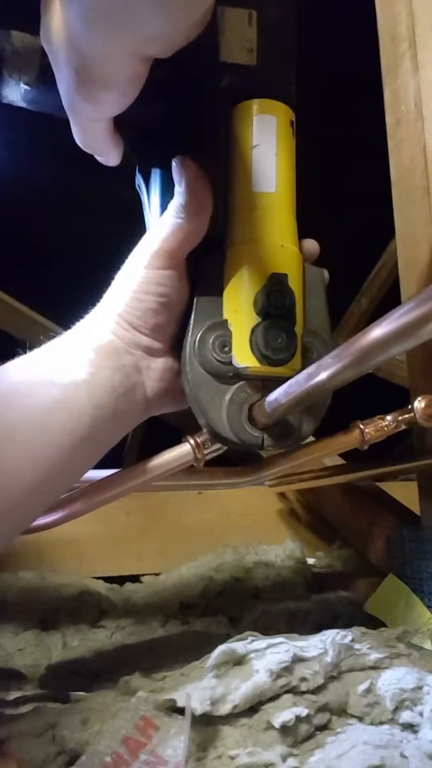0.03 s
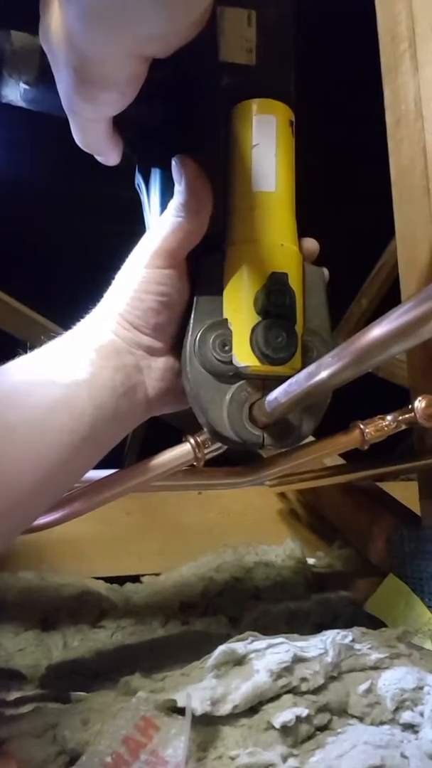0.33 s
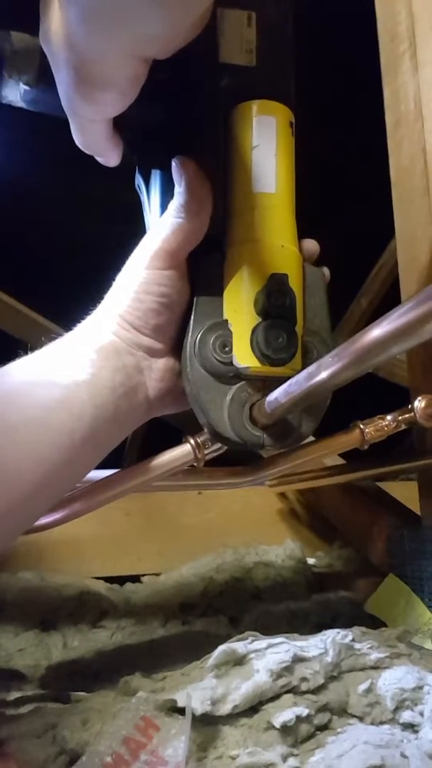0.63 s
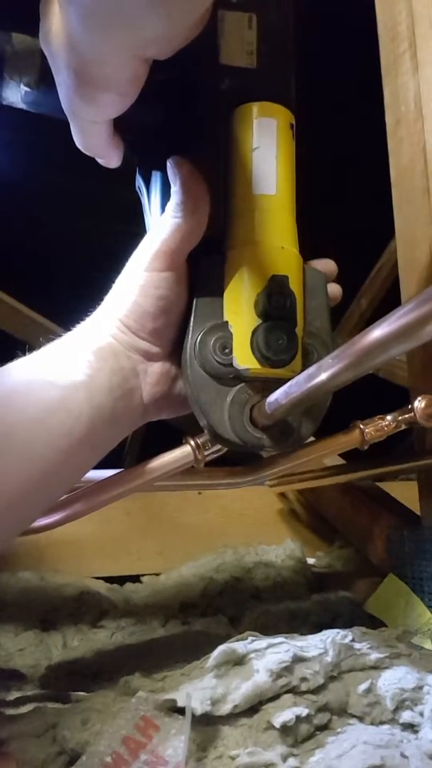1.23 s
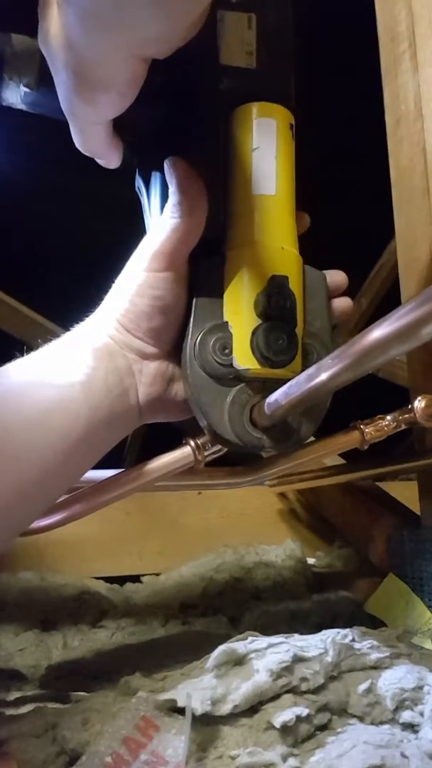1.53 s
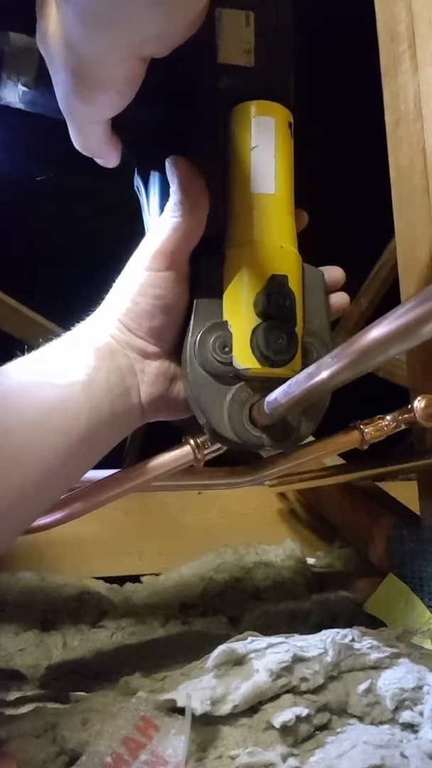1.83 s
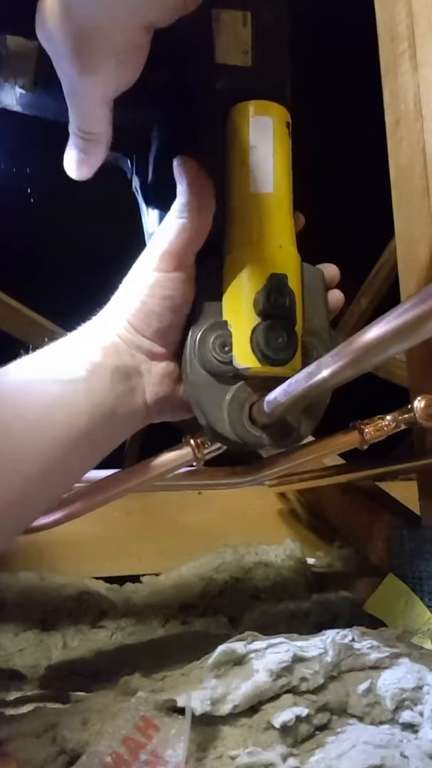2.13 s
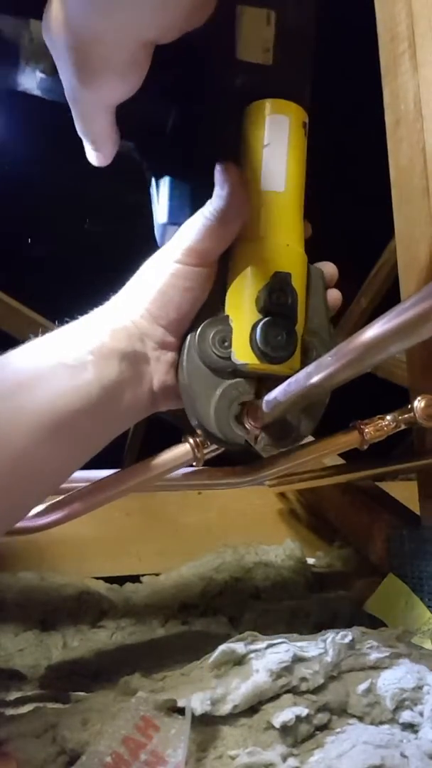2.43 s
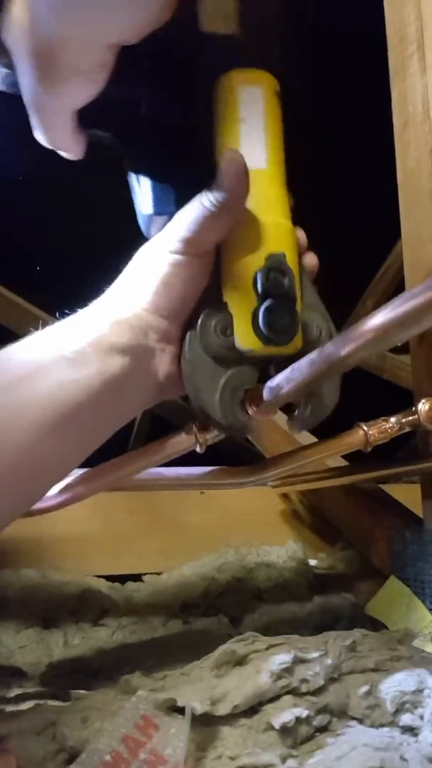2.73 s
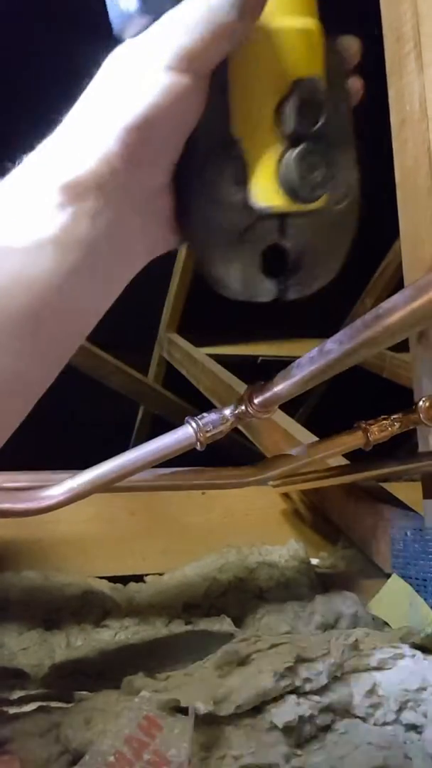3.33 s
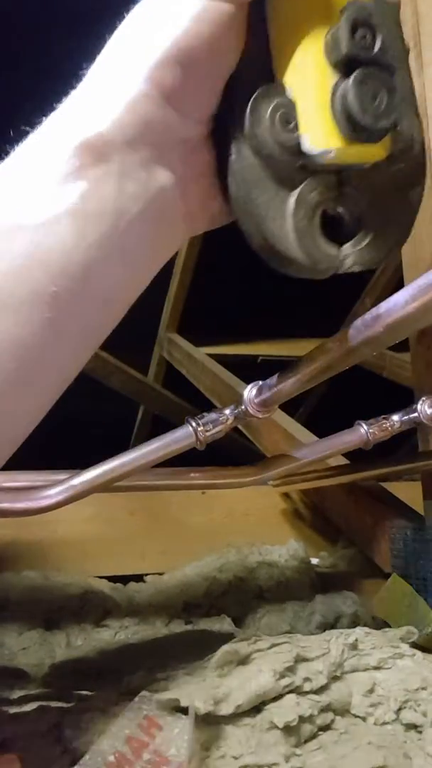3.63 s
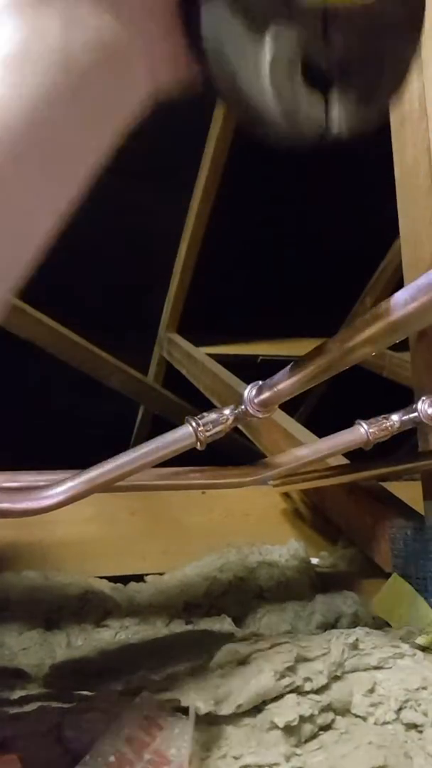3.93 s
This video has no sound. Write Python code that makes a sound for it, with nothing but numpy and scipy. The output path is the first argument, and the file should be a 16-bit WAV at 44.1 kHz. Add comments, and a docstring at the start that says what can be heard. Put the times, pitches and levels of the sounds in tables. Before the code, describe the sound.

Close up in an attic, a hydraulic crimping tool runs with a fast rattling whine, strains, pops and cuts out. Metal jaws then clunk open and knock against copper pipe, followed by light clicks and faint handling.

```python
"""A cordless hydraulic press tool crimps a copper fitting, close by in an attic.
Its geared motor drives a rattling piston pump and sags under load until the relief valve pops,
then runs free under the valve's whistle and stops. The steel jaws clunk open, knock against the pipe
and click shut; the tool is lifted away with a rustle and a soft bump."""
import sys
import numpy as np
from scipy import signal
from scipy.fft import rfft, irfft
from scipy.io import wavfile

SR = 44100
rng = np.random.default_rng(int(sys.argv[2]) if len(sys.argv) > 2 else 0)


def wav_out(sig):
    """Save sig, one row per channel (or a flat mono array), as 16-bit PCM at SR to the path in sys.argv[1]."""
    wavfile.write(sys.argv[1], SR, np.round(np.clip(np.atleast_2d(sig).T, -1, 1) * 32767).astype(np.int16))


N = 176400
TIME = np.arange(N) / SR
GEAR_RATIO, RELEASE_S = 15, 1.75  # shaft turns per pump turn; when the valve has shed the load
WAVER_RAD, METAL_CRACK = .12, .8  # phase drift of the drive tones; first contact of bare metal

# Motor shaft speed: time_s, speed_hz
SHAFT_SPEED = [(0.0, 417.0), (0.3, 413.6), (0.7, 411.7), (1.0, 406.4), (1.25, 400.2), (1.45, 392.0),
               (1.6, 377.4), (1.69, 362.2), (1.73, 374.0), (1.76, 400.0), (1.79, 416.0), (1.87, 424.7),
               (1.932, 425.0), (1.955, 275.0), (1.98, 110.0), (2.02, 20.0)]
# Stereo placement of the tool body: freq_hz, left_minus_right_db
TOOL_PAN = [(60, -19), (110, -3.5), (200, -2.5), (380, -4), (700, 9), (1290, 10.5), (2380, 15), (4400, 4.5),
            (8120, 15.5), (15000, 17.5)]
# Stereo placement of the jaws: freq_hz, left_minus_right_db
JAW_PAN = [(60, -7.5), (250, -1), (700, 5), (1500, 17.5), (4000, 11.5), (10000, 18.5)]


def pump(turns):
    """Each stroke knocks and drags a rattle through the metal case; oil squirts once a turn."""
    # Strokes in one pump turn: start_turns, knock_gain, rattle_gain, rattle_length_turns
    strokes = [(0.014, 0.99, 0.49, .43), (0.492, 1, .4, .1), (.6, 0.27, 0.23, .1)]
    # Tone of the rattling case: freq_hz, gain_db
    rattle_eq = [(30, -40.5), (70, -29), (110, -28), (200, -20.5), (300, -10), (420, -12.5), (520, -21),
                 (645, -16.5), (770, -11), (915, -9), (991, -14), (1110, 0.5), (1210, -4), (1340, -7.5),
                 (1440, -2), (1730, -9.5), (1920, -9.5), (2310, -2), (2740, -7), (3080, -3), (3400, -8),
                 (3760, -7), (4350, -6.5), (4900, -13.5), (5380, -15.5), (6300, -11.5), (7380, -5.5),
                 (8040, -13), (9280, -5.5), (10500, -3.5), (12700, -10), (15100, -16), (16000, -22)]
    # Extra EQ once the pump runs free: freq_hz, gain_db
    free_run_eq = [(100, 3), (300, -0.5), (600, 3), (850, -8.5), (1400, 0.5), (2400, -1.5), (4000, -3),
                   (7000, -3), (11000, -3), (16000, -3.5)]
    # Oil through the pump valve: freq_hz, gain_db
    squirt_eq = [(2000, -37.5), (3200, -9), (3750, 7), (4300, -14), (5200, -30)]
    # Pump fader: time_s, level_db
    effort = [(0, -22), (.8, -21.5), (1.5, -22.5), (1.69, -22.5), (1.75, -25), (1.95, -24), (1.98, -31),
              (2.015, -47), (2.03, -99.5)]
    knock_decay_turns, knock_spread_db, idle_rattle = .045, 1.5, .3
    power, phase = idle_rattle ** 2, turns % 1
    hardness = .8 + .5 * np.sqrt(load())
    for start, knock, rattle, length in strokes:
        age = (turns - start) % 1
        stroke_index = np.floor(turns - start).astype(int)
        force = hardness * amp(knock_spread_db * rng.standard_normal(100))[stroke_index]
        power += (knock * force * np.exp(-age / knock_decay_turns)) ** 2
        power += rattle ** 2 * np.exp(-(age / length) ** 4)
    throb = 1 + .14 * np.sin(2 * np.pi * GEAR_RATIO * phase)  # once a shaft turn
    grit = pair([grains(per_s=25000, spread_db=.46) for _ in range(2)]) * np.sqrt(power) * throb
    case_ring = amp(-10) * through(grit, tail([(1000, .02)]))
    clatter = colour(grit + case_ring, rattle_eq, TOOL_PAN)
    squirt = wash(squirt_eq, TOOL_PAN) * amp(-10.5) * swell(phase - .28, width=.16)
    loaded = TIME < RELEASE_S
    rms = clatter.mean(0)[loaded].std()
    free_run = colour(clatter, free_run_eq)
    return np.where(loaded, clatter / rms + squirt, free_run / rms) * amp(curve(effort))


def load():
    """Oil back-pressure, 0-1, taken from the motor's sag until the valve opens."""
    free_hz, full_sag_hz, release_fall_s = 425, 63, .03
    sag = np.clip((free_hz - curve(SHAFT_SPEED)) / full_sag_hz, 0, 1)
    return sag * np.clip((RELEASE_S - TIME) / release_fall_s, 0, 1)


def drivetrain(turns):
    """Gears and motor sing together, running ahead and behind in each pump turn under load."""
    # Fader for the gear tones: time_s, gain_db
    fader = [(0, 4), (1.2, 3.5), (1.6, 3.5), (1.74, 4.5), (1.8, -12), (1.95, -7), (2.02, -24), (2.05, -59)]
    # Tone of the whole drive: freq_hz, gain_db
    drive_eq = [(60, -14.5), (100, -6.5), (400, -5.5), (1200, 0), (5000, 12)]
    wobble_turns, left_delay_s = .009, .0003
    turns = turns + wobble_turns * load() * np.sin(2 * np.pi * turns)
    tones = np.sqrt(2) * (gears(turns) * amp(curve(fader)) + motor(turns))
    left = np.interp(TIME - left_delay_s, TIME, tones)
    return colour(np.array([left, tones]), drive_eq, TOOL_PAN)


def gears(turns):
    """Multiples of the pump rate sweep across the resonances of the housing."""
    # Prominent gear tones: pump_rate_multiple, level_db
    orders = [(2, -63.5), (3, -64), (4, -48), (5, -63), (6, -48.5), (7, -58.5), (8, -51.5), (9, -50.5),
              (11, -55), (13, -49.5), (16, -60), (24, -50.5), (27, -56), (28, -47.5), (29, -48.5),
              (34, -56), (41, -54), (47, -47), (51, -50)]
    # Housing resonances: centre_hz, width_hz, boost_db
    housing = [(104.7, 9, 5), (247.4, 30, 13), (290, 45, 6)]
    pump_hz = curve(SHAFT_SPEED) / GEAR_RATIO
    out, other_orders_db = 0, -59
    for order in range(2, 58):
        db = dict(orders).get(order, other_orders_db) + drift(17)
        db += sum(boost / (1 + (2 * (order * pump_hz - hz) / width) ** 2) for hz, width, boost in housing)
        out += amp(db) * np.sin(2 * np.pi * (order * turns + rng.random()) + WAVER_RAD * drift(30))
    return out


def motor(turns):
    """The motor hums at shaft speed and whines at three times that."""
    # Balance of the motor tones: time_s, hum_db, whine_db
    levels = [(0, -33.5, -32.5), (1.201, -29.5, -31.5), (1.68, -33, -31.5), (1.75, -47, -37),
              (1.8, -36.5, -36), (1.93, -42.5, -37.5), (1.977, -49, -39), (1.999, -70, -58),
              (2.04, -120, -120)]
    s, hum_db, whine_db = np.transpose(levels)
    shaft = 2 * np.pi * GEAR_RATIO * turns
    hum = amp(np.interp(TIME, s, hum_db)) * np.sin(shaft)
    whine = amp(np.interp(TIME, s, whine_db)) * np.sin(3 * shaft + WAVER_RAD * drift(60))
    return hum + whine


def housing_groan():
    """The housing groans low near full pressure."""
    # Groan resonances: freq_hz, gain_db
    groan_eq = [(150, -45), (225, -15.5), (250, 4.5), (270, -10.5), (292, -0.5), (320, -18.5), (355, -4),
                (450, -44.5)]
    # Groan fader: time_s, level_db
    fader = [(0, -63), (1.2, -58), (1.5, -43), (1.68, -41), (1.73, -31), (1.79, -34), (1.85, -46),
             (1.96, -44), (2.1, -64), (2.2, -95)]
    return wash(groan_eq, TOOL_PAN) * amp(curve(fader))


def valve_pops():
    """A faint knock at full pressure, then the relief valve pops open."""
    # Cues, a faint knock then the valve pop: start_s, level_db
    cues = [(1.69, -26), (1.717, -14)]
    # Pop tone: freq_hz, gain_db
    pop_eq = [(80, -9), (280, 3), (500, -5.5), (800, -14.5), (1300, 7.5), (1900, -9.5), (4000, -4),
              (5500, -19.5), (11000, -20), (16000, -28)]
    # Pop decay: freq_hz, t60_s
    decays = [(200, 0.18), (1200, 0.049), (10000, 0.029)]
    return sum(place(s, db, blow(pop_eq, decays)) for s, db in cues)


def valve_whistle():
    """Oil sings through the open valve."""
    # Rising whistle: time_s, pitch_hz, level_db
    glide = [(1.765, 4900, -70), (1.78, 4950, -38), (1.825, 5030, -39.5), (1.935, 5110, -41),
             (1.95, 5200, -75)]
    s, hz, db = np.transpose(glide)
    jitter_rad = 1.2 * drift(180)
    tone = np.sin(2 * np.pi * np.cumsum(np.interp(TIME, s, hz)) / SR + jitter_rad)
    return tone * np.interp(TIME, s, amp(db), left=0, right=0) * amp([[4], [-4]])


def jaw_clunks():
    """The steel jaws clunk open and ring with the pipe."""
    # Clunk cues: start_s, level_db, ring_db, treble_db_per_octave, decay_stretch
    cues = [(2.512, -28, -9, -4.5, 1.2), (2.5217, -17.5, -1, 0.5, 1.08)]
    # Clunk tone: freq_hz, gain_db
    clunk_eq = [(30, -15.5), (60, -16), (133, -11), (214, 2.5), (340, -8.5), (470, -22), (680, -6.5),
                (920, -18), (1060, -19.5), (1200, -12.5), (1410, -19), (1650, -8.5), (2170, -4.5),
                (2760, -13.5), (3600, -11.5), (5500, -21.5), (8000, -30), (12000, -29.5), (15500, -37)]
    # Clunk decay before stretching: freq_hz, t60_s
    decays = [(100, 1), (250, 0.27), (800, 0.13), (3000, 0.067), (12000, 0.072)]
    # Modes of jaws and pipe: pitch_hz, level_db, t60_s
    modes = [(101, -19.5, 1), (210, -5, 0.29), (336, -9, 0.18), (693, -15, 0.071), (902, -11, 0.18),
             (1202, -3, 0.072), (1565, -9, .09), (1740, -17, .1), (1960, -18, 0.059), (2290, 4.5, 0.037),
             (2530, -9, 0.12), (3720, -12, .12), (4520, -19, 0.13), (6400, -30.5, 0.3)]
    out = 0
    for s, db, ring_db, tilt, stretch in cues:
        body = blow(tilt_treble(clunk_eq, tilt), [(hz, t60 * stretch) for hz, t60 in decays])
        out += place(s, db, body + amp(ring_db) * ring(modes, rise_s=.003))
    return out


def pipe_knocks():
    """The open jaws knock against the pipe and set it ringing."""
    # Knock cues: start_s, level_db, ring_db, treble_db_per_octave
    cues = [(2.758, -39, 3.5, -4), (2.788, -27.5, -1.5, -3), (2.914, -47.5, 0, -1)]
    # Knock tone: freq_hz, gain_db
    knock_eq = [(60, -24), (150, -3), (320, 0), (480, -18), (690, 3), (950, -14.5), (1220, -2),
                (1500, -13.5), (2100, -1), (2900, -15), (4000, -10.5), (5500, -21), (8000, -27),
                (15000, -35)]
    # Knock decay: freq_hz, t60_s
    decays = [(100, .35), (300, .18), (800, .08), (3000, .07), (12000, .035)]
    # Pipe modes: pitch_hz, level_db, t60_s
    modes = [(113, -11, 0.18), (238.5, -2, 0.19), (344, -6.5, 0.2), (630, -17.5, 0.39), (720, -6, 0.067),
             (1234, -14, 0.23), (1670, -20, 0.22), (1990, -22, 0.087), (2200, -10, 0.15), (2660, -30.5, .6),
             (2880, -32.5, 0.61), (3520, -21, 0.086), (6309, -37, 0.37)]
    out = 0
    for s, db, ring_db, tilt in cues:
        body = blow(tilt_treble(knock_eq, tilt), decays, METAL_CRACK)
        out += place(s, db, body + amp(ring_db) * ring(modes, rise_s=.0012))
    return out


def clicks():
    """Sharp clicks as the motor halts and the jaw tips shut."""
    # Click cues: start_s, level_db, tilt_db_per_octave
    cues = [(2.009, -41, -2), (3.191, -34.5, 1), (3.197, -34, 2), (3.227, -39, 4.5), (3.263, -29.5, 1.5)]
    # Click tone: freq_hz, gain_db
    click_eq = [(120, -51), (200, -40), (581, -8), (804, -32), (1040, 1), (1200, 7), (1950, -16), (2130, 0),
                (2420, 2.5), (4720, -18), (5170, -19.5), (8260, -23), (8880, -27), (10800, -21.5),
                (15000, -29)]
    # Click decay: freq_hz, t60_s
    decays = [(300, 0.079), (1200, 0.0083), (3000, 0.035), (12000, 0.012)]
    out = 0
    for s, db, tilt in cues:
        tilted_eq = [(hz, gain + tilt * np.log2(hz + 1)) for hz, gain in click_eq]
        out += place(s, db, blow(tilted_eq, decays))
    return out


def grip():
    """Mechanism and grip give small ticks and a fine crackle."""
    # Tick cues: start_s, level_db
    cues = [(2.211, -49), (2.37, -52), (2.429, -52), (2.463, -56), (3.02, -54), (3.142, -48), (3.318, -50)]
    # Tick tone: freq_hz, gain_db
    tick_eq = [(200, 24), (600, 7.5), (1800, 9), (4000, 4.5), (8000, -3), (15000, -8)]
    # Tick decay: freq_hz, t60_s
    decays = [(200, 0.12), (2000, 0.045), (12000, .015)]
    # Crackle fader: time_s, level_db
    fader = [(2.2, -97.5), (2.3, -80), (2.38, -73), (2.5, -66), (2.6, -93), (2.88, -94.5), (2.98, -82),
             (3.15, -70), (3.4, -80), (3.6, -72), (4, -85)]
    ticks = sum(place(s, db, blow(tick_eq, decays, METAL_CRACK)) for s, db in cues)
    snaps = through(grains(per_s=170, spread_db=.5), tail([(1000, .0082)]))
    crackle = unit(colour(snaps, [(500, -9.5), (4000, 6), (15000, -3)], JAW_PAN))
    return ticks + crackle * amp(curve(fader))


def hand_rub():
    """The hand shifts on the tool with a low rumble and a grainy rustle."""
    # Rumble tone: freq_hz, gain_db
    rumble_eq = [(15, -45.5), (25, -18), (86, 5.5), (116, 1), (135, -6.5), (283, -3), (412, -15),
                 (552, -24.5), (700, -27), (910, -52.5), (1540, -120)]
    # Rumble fader: time_s, level_db
    rumble_fader = [(2, -53.5), (2.19, -63.5), (2.22, -46), (2.34, -56), (2.48, -58.5), (2.85, -50.5),
                    (3.1, -57), (3.4, -65), (3.52, -51.5), (3.7, -66.5), (3.75, -56.5), (3.79, -41.5),
                    (3.88, -54), (4, -68.5)]
    # Rustle tone: freq_hz, gain_db
    rustle_eq = [(100, 2.5), (600, -2.5), (1100, 0.5), (1650, 1.5), (2300, -3.5), (3000, -3.5), (4500, -8),
                 (8000, -18), (15000, -18)]
    # Rustle fader before trim: time_s, level_db
    rustle_fader = [(2.06, -76.5), (2.19, -95), (2.23, -58.5), (2.3, -61.5), (2.4, -71), (2.5, -53.5),
                    (2.6, -57), (2.74, -69), (2.85, -52), (3.0, -65), (3.12, -67.5), (3.2, -57.5),
                    (3.3, -57.5), (3.6, -56.5), (3.7, -61), (3.8, -54.5), (4, -62.5)]
    rumble = wash(rumble_eq, JAW_PAN) * amp(curve(rumble_fader))
    friction = np.array([grains(per_s=8000, spread_db=5.5) for _ in range(2)])
    rustle = unit(colour(friction, rustle_eq, pan=[(500, 1), (3000, 4), (10000, 9.2)]))
    trim_db = -8 + .76 * drift(43)
    return rumble + rustle * amp(curve(rustle_fader) + trim_db)


def hand_moves():
    """Hand and sleeve swish past; the hand bumps softly."""
    # Swish cues: centre_s, width_s, level_db
    swishes = [(2.48, 0.022, -76), (3.435, 0.016, -59.5), (3.52, 0.022, -57), (3.6, 0.025, -56),
               (3.78, 0.058, -61)]
    # Swish tone: freq_hz, gain_db
    swish_eq = [(500, 7.5), (2000, 2), (5000, 1.5), (8000, -8.5), (12000, -3), (16000, -9)]
    # Bump cues: centre_s, width_s, pitch_hz, level_db
    bumps = [(3.606, 0.029, 73.5, -50), (3.817, 0.04, 67, -30.5), (3.922, 0.11, 68, -49.5)]
    cloth = wash(swish_eq, pan=[(500, 2), (10000, 30)])
    strokes = sum(amp(db) * swell(TIME - s, width) for s, width, db in swishes)
    thuds = sum(amp(db) * swell(TIME - s, width) * np.sin(2 * np.pi * hz * (TIME - s))
                for s, width, hz, db in bumps)
    return cloth * strokes + thuds * amp([[-4], [3]])


def attic_echo(send):
    """A short, dark reverb among the rafters."""
    # Attic decay: freq_hz, t60_s
    decays = [(100, 0.55), (300, 0.42), (1000, 0.41), (4000, 0.23), (14000, 0.051)]
    return through(send, tail(decays))


def room_tone():
    """A faint, low bed of noise."""
    # Tone of the bed: freq_hz, gain_db
    bed_eq = [(30, 3), (70, 6.5), (250, -2.5), (600, -18.5), (2000, -34.5), (6000, -38), (16000, -35)]
    return amp(-77.5) * wash(bed_eq)


def blow(eq, decays, crack=.16):
    """The crack of first contact and its dense ringing, at rms 1 over the first 5 ms."""
    hit = colour(tail(decays) + crack * (np.arange(SR) == 0), eq, JAW_PAN)
    return hit / np.sqrt(np.mean(hit[:, :220] ** 2))


def ring(modes, rise_s):
    """Dying modes of a struck metal part."""
    t = TIME[:SR]
    tones = sum(amp(db - 60 * t / t60) * np.sin(2 * np.pi * (hz * t + rng.random()))
                for hz, db, t60 in modes)
    return colour(tones * (1 - np.exp(-t / rise_s)), [(1000, .0054)], JAW_PAN)


def tail(decays):
    """One second of dense modes, each band dying at its own speed."""
    hz, spectrum = np.fft.rfftfreq(SR, 1 / SR), rfft(noise(SR))
    centres, out = np.geomspace(60, 15000, 9), 0
    for centre, pick in zip(centres, np.eye(9)):
        band = irfft(spectrum * read(np.c_[centres, pick], hz))
        fade = amp(-60 * TIME[:SR] / read(decays, centre))
        out += band * fade / np.linalg.norm(fade)
    return out


def grains(per_s, spread_db):
    """Tiny impacts of random size."""
    size = amp(spread_db * np.minimum(rng.exponential(1, N), 4)) * rng.choice([-1, 1], N)
    return unit(size * (rng.random(N) < per_s / SR))


def wash(eq, pan=None):
    """Steady shaped noise at unit level."""
    return unit(colour(noise(N), eq, pan))


def noise(size):
    """Stereo noise."""
    return pair(rng.standard_normal((2, size)))


def pair(x):
    """Two unrelated signals become a stereo pair, alike in the bass."""
    # Likeness of left and right: freq_hz, correlation (clipped to +-1)
    likeness = [(60, 0.75), (300, 0.91), (600, -0.078), (1200, -1.4), (2500, -0.72), (6000, 0.72)]
    a, b = rfft(x)
    size = len(x[0])
    same = np.clip(read(likeness, np.fft.rfftfreq(size, 1 / SR)), -1, 1)
    return irfft([a, same * a + np.sqrt(1 - same ** 2) * b], size)


def colour(x, eq, pan=None):
    """Minimum-phase EQ with an optional left-right balance."""
    hz = abs(np.fft.fftfreq(4096, 1 / SR))
    gain = amp(read(eq, hz))[None]
    if pan is not None:
        lean = amp(np.outer([.5, -.5], read(pan, hz)))
        gain = gain * lean / np.sqrt((lean ** 2).mean(0))
    log_response = np.conj(signal.hilbert(np.log(gain + 1e-6)))
    return through(x, np.fft.ifft(np.exp(log_response)).real)


def tilt_treble(eq, db_per_octave):
    """Tilts an EQ curve above 2 kHz."""
    return [(hz, db + db_per_octave * max(np.log2(hz / 2000), 0)) for hz, db in eq]


def through(x, response):
    """Convolves with an impulse response."""
    return signal.fftconvolve(np.atleast_2d(x), np.atleast_2d(response), axes=1)[:, :x.shape[-1]]


def place(start_s, db, sound):
    """Lays a sound on an empty stereo track."""
    return amp(db) * np.pad(sound, ((0, 0), (round(start_s * SR), N)))[:, :N]


def swell(offset, width):
    """Bell-shaped envelope."""
    return np.exp(-(offset / width) ** 2)


def drift(rate_hz):
    """Random wander."""
    return np.interp(TIME * rate_hz, np.arange(1000), rng.standard_normal(1000))


def read(points, hz):
    """Reads a table on a log-frequency axis."""
    freqs, values = np.transpose(points)
    return np.interp(np.log(hz + 1), np.log(freqs + 1), values)


def curve(points):
    """Reads a table along time."""
    return np.interp(TIME, *np.transpose(points))


def amp(db):
    """Decibels to gain."""
    return 10 ** (np.asarray(db) / 20)


def unit(x):
    """Scales the middle of the stereo image to rms 1."""
    return x / np.sqrt(np.mean(np.atleast_2d(x).mean(0) ** 2) + 1e-20)


def scene():
    """The tool and the hand on it over room tone; pump and impacts feed the attic echo."""
    turns = np.cumsum(curve(SHAFT_SPEED)) / SR / GEAR_RATIO - .139  # pump turns, offset to the first stroke
    rattle = pump(turns)
    hits = valve_pops() + jaw_clunks() + pipe_knocks() + clicks() + grip()
    echo = attic_echo(amp(-18) * rattle + amp(-21) * hits)
    tool = rattle + hits + drivetrain(turns) + housing_groan() + valve_whistle()
    return tool + echo + hand_rub() + hand_moves() + room_tone()


def record(dry):
    """Clips at full scale and cuts the highest treble."""
    lowpass = signal.firwin(511, 15950, window=("kaiser", 9), fs=SR)
    return signal.oaconvolve(np.clip(dry, -1, 1), lowpass[None], "same")


dry = scene()
out = record(dry)
wav_out(out)
```